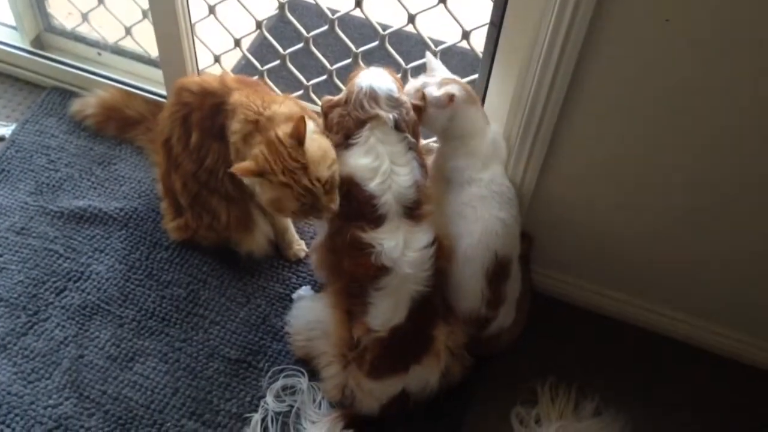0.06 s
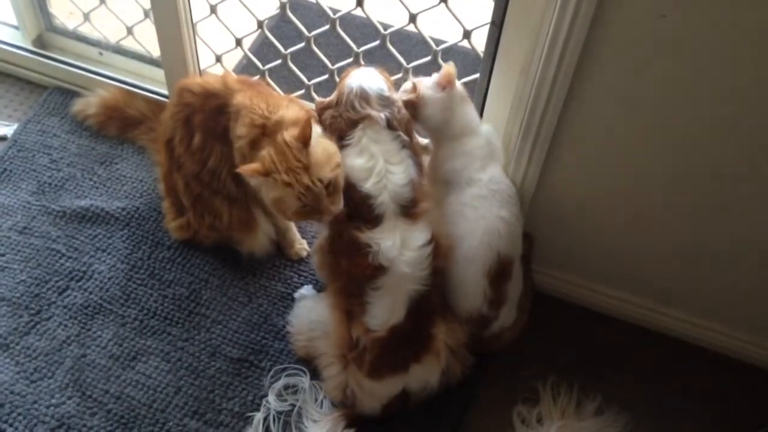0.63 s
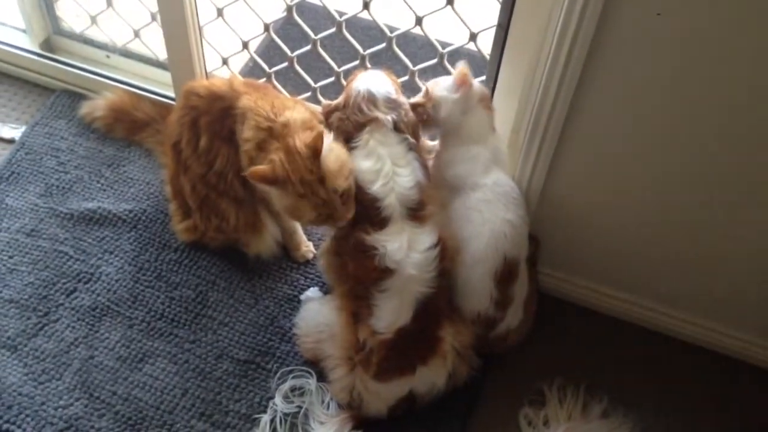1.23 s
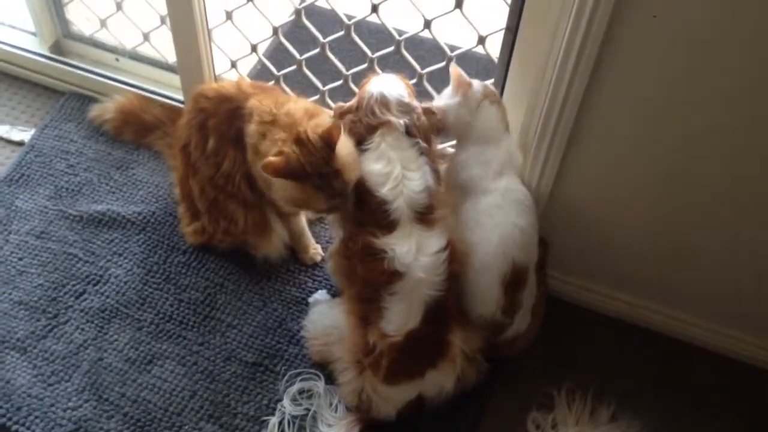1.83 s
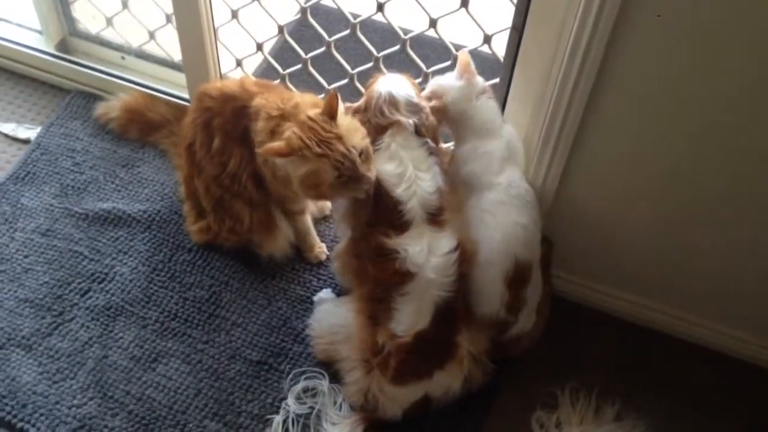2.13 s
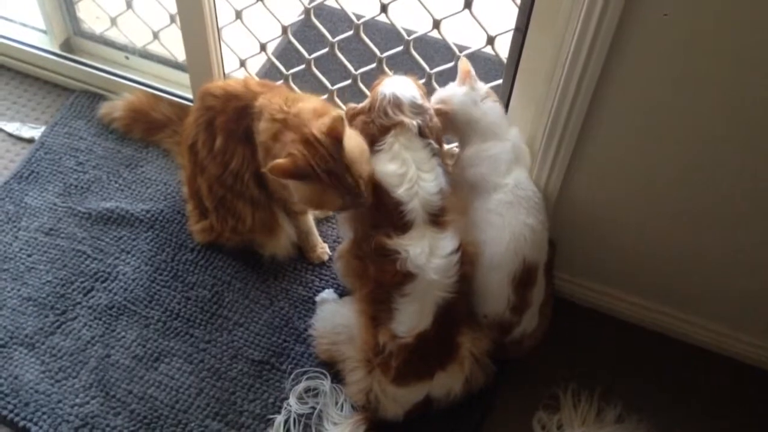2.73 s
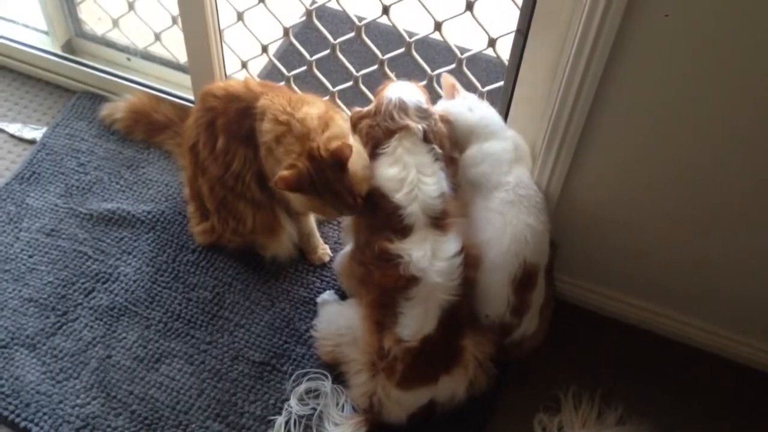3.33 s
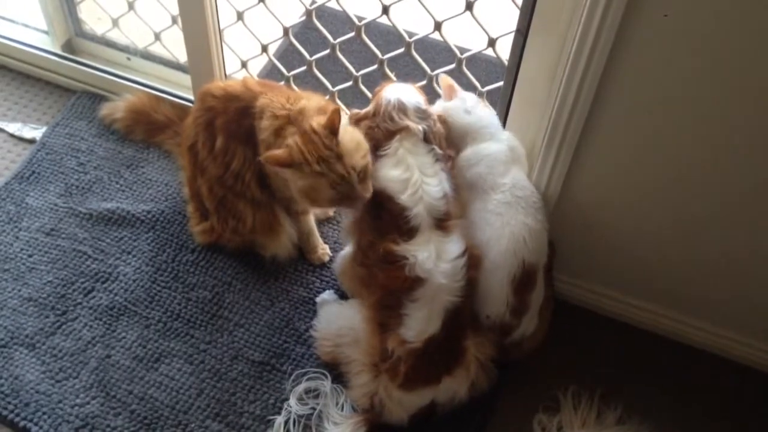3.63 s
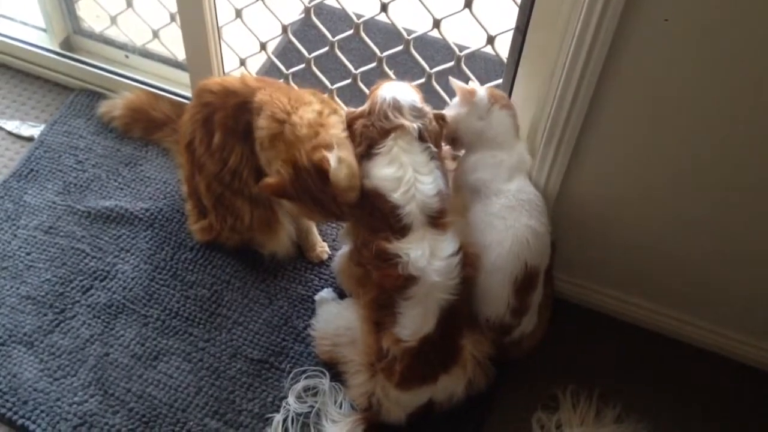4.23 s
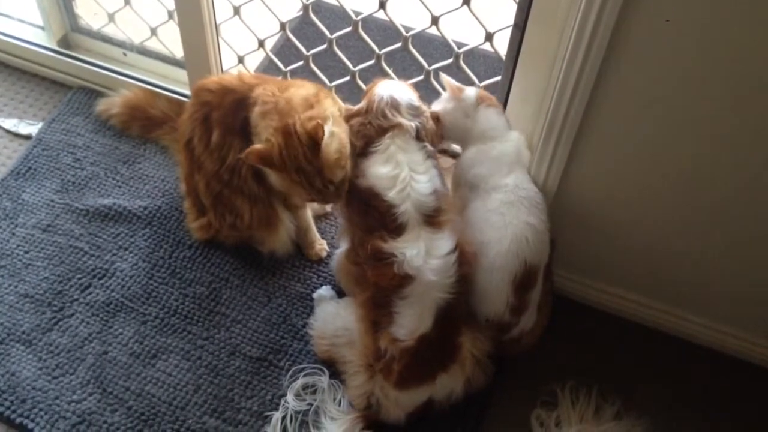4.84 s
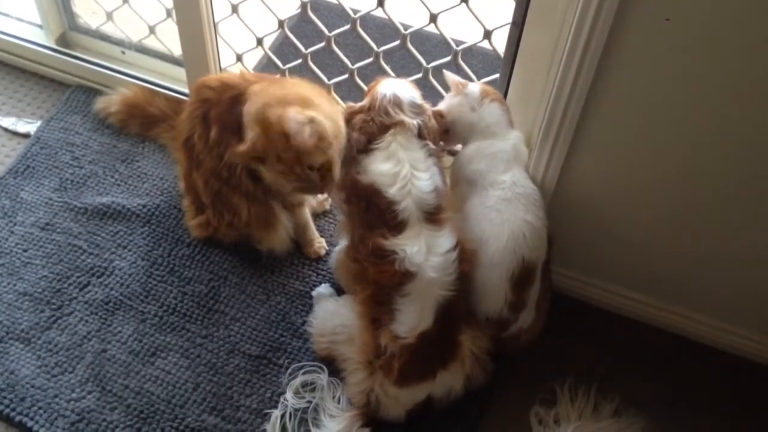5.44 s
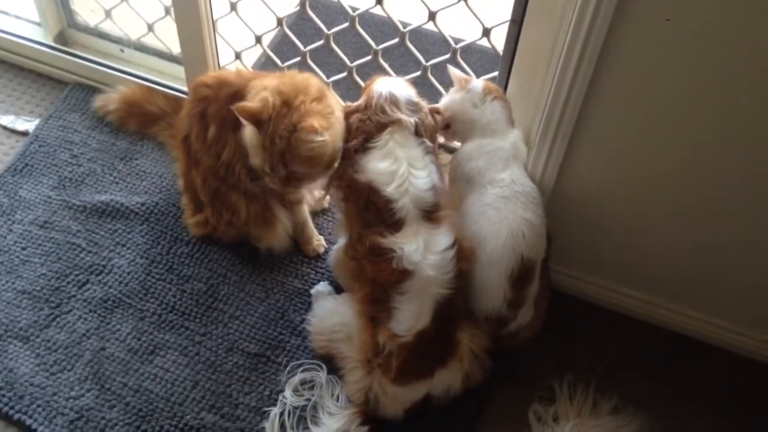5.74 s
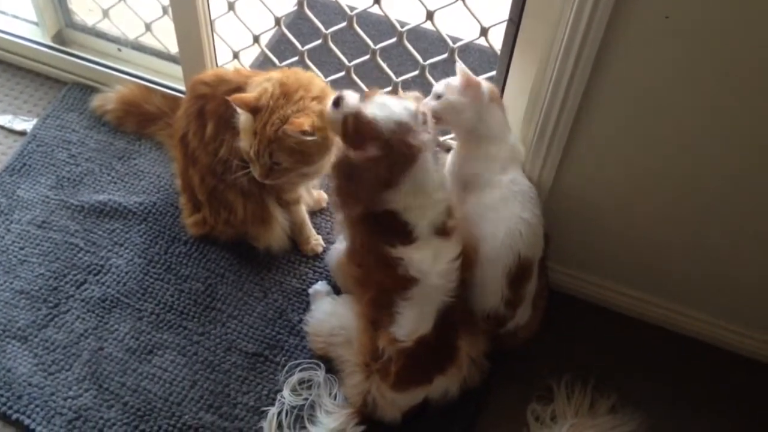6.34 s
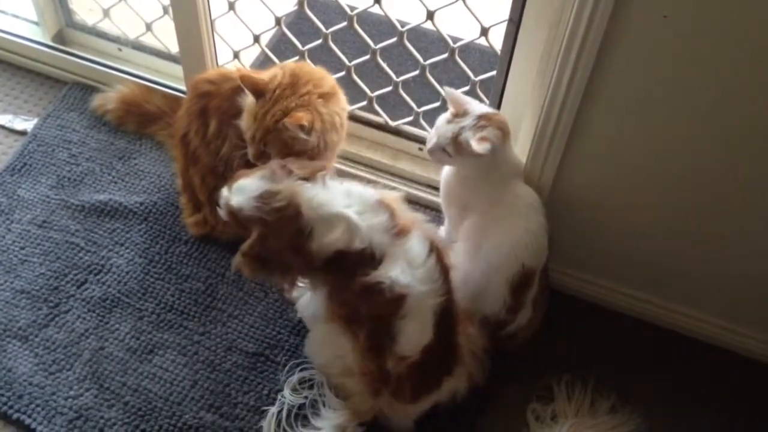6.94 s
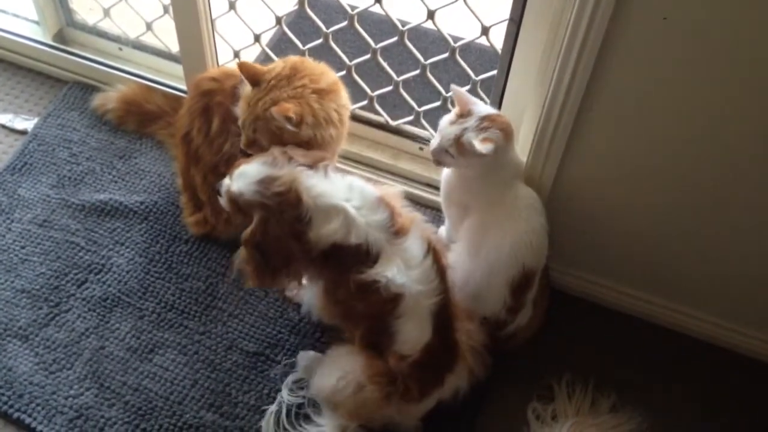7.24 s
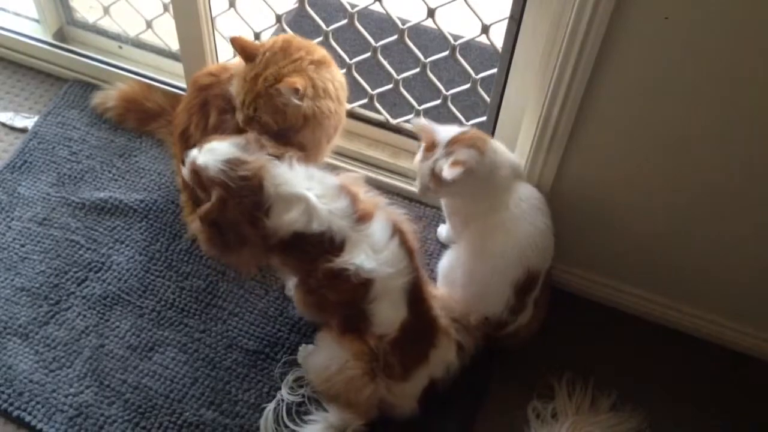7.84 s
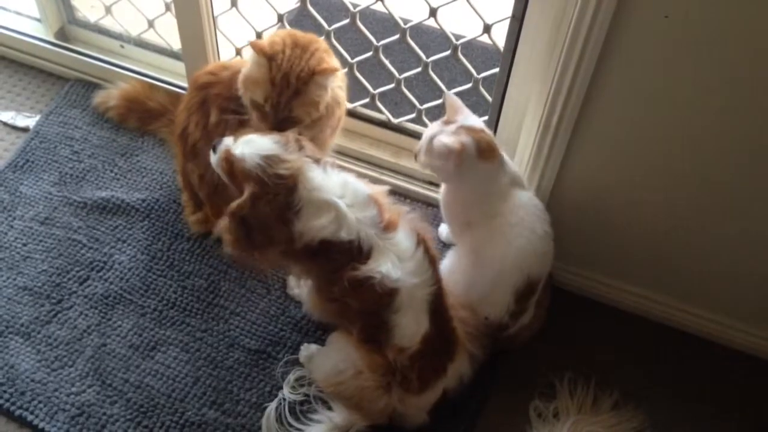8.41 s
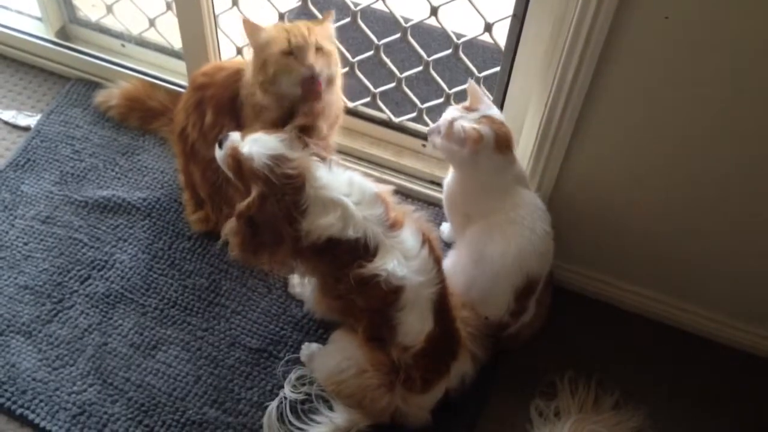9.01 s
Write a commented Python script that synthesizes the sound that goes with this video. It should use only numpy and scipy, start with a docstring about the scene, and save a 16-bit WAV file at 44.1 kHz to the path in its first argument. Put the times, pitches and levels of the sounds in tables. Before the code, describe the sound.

A bird just outside a screen door calls six times, about every two seconds. Each brief call starts as a rasping squeal and cracks upward into a shrill whistle, ringing slightly in the porch and hallway. Distant birds add faint chirps, then soft nasal calls. A pet bumps the floor once midway, and fur barely brushes the door. A small microphone picks up a low hum and quiet outdoor hush.

```python
"""A bird just outside a screen door calls six times, each a low, rasping squeal that cracks upward into a
shrill whistle as its vibrating membrane flips register. Three drawn calls climb the same six notes; three
sharp ones swoop and leap briefly to a top note. The porch and the hallway ring after them.
Farther off, birds chirp and call faintly; a pet bumps the floor once and fur brushes the door.
Under it all, the small microphone picks up a low hum and a quiet outdoor hush."""
import sys
import numpy as np
from scipy import signal
from scipy.fft import rfft, irfft, next_fast_len
from scipy.io import wavfile
from scipy.ndimage import uniform_filter1d, map_coordinates

SR = 44100
rng = np.random.default_rng(int(sys.argv[2]) if len(sys.argv) > 2 else 0)


def dump_mix(stems):
    """Bounce the given channels to the path in sys.argv[1] as a 16-bit WAV at rate SR."""
    frames = np.atleast_2d(stems).T  # one column per channel
    limited = np.clip(frames, -1, 1)  # hard clip at full scale
    pcm = np.round(limited * 32767).astype(np.int16)
    wavfile.write(sys.argv[1], SR, pcm)


N = 404397

# colour of the outdoor hush: frequency_hz, relative_db
HUSH_COLOUR = [(12, -50), (20, -12), (57, -6.5), (76, -1), (118, -12), (170, -10.5), (206, -13.5),
               (340, -13.5), (488, -19.5), (782, -18), (2660, -27), (3810, -26.5), (6460, -30.5),
               (14100, -32), (15300, -32.5)]
# course that the hum wavers around: time_s, level_db
HUM_LEVELS = [(0, -65), (.8, -66), (1.4, -65.5), (1.8, -72), (3.1, -64.5), (4, -68), (5.2, -72.5),
              (8.6, -76.5), (9.15, -70)]
# soft contacts of the pet's one bump: start_s, strike_db
PET_CONTACTS = [(4.384, -52.5), (4.413, -55), (4.440, -58)]
# modes of the floor: frequency_hz, gain_db, t60_s
FLOOR_MODES = [(71, -3, 0.117), (139, 8, 0.051), (186, -17, 0.028)]
# fur against the door: centre_s, half_length_s, level_db
FUR_BRUSHES = [(0.788, .025, -64.5), (1.277, .01, -64), (6.603, 0.069, -69.5)]

# distant chirps: start_s, length_s, start_hz, end_hz, source_db, rasp (0-1)
FAR_CHIRPS = [(2.17, .11, 3880, 2880, -64, .03), (3.41, .15, 3880, 3930, -69, .25),
              (4.645, .03, 3720, 3760, -64, .1)]
# distant nasal calls: start_s, source_db
FAR_NASAL_CALLS = [(6.16, -64.5), (6.67, -68), (7.27, -64.5), (7.78, -65), (8.27, -66.5)]
# strength of a harmonic by where it falls, for each voice: frequency_hz, relative_db
FAR_CHIRP_COLOUR = [(4000, -1), (7500, -14)]
FAR_NASAL_COLOUR = [(650, -8), (1300, 1), (1950, 0), (2600, -18)]
SWOOP_SQUEAL_COLOUR = [(1150, -19.5), (1550, -9), (2400, -7.5), (3100, 2), (3600, -1), (4300, 10),
                       (4800, 1.5), (5600, -4), (7200, -16.5), (9500, -22), (12000, -39)]
DRAWN_SQUEAL_COLOUR = [(1400, -11.5), (2900, 3.5), (4300, -10.5), (5800, -20), (7300, -25), (10000, -38)]
NEAR_WHISTLE_COLOUR = [(2700, 6), (3100, -1.5), (3500, 0.5), (4800, 1.5), (5500, 5.5), (6300, -8),
                       (7000, -12), (8000, -11.5), (8600, -14.5), (9500, -17), (10200, -31), (11000, -21),
                       (12000, -32.5), (15000, -32)]
# colour of the air in a rasp: frequency_hz, relative_db
BREATH_COLOUR = [(1000, -23), (2400, -15), (3700, 10.5), (4900, -31), (7000, -5), (10000, -10),
                 (15000, -20)]

# squeals opening the sharp calls, and two brief ones inside drawn calls, one curve each:
# time_s, pitch_hz, level_db, rasp (0-1)
SWOOP_SQUEALS = [
    [(.258, 1250, -50, 0.01), (.271, 1352, -50, 0.3), (.274, 1012, -44, 0.13), (.284, 1221, -35.5, .2),
     (.293, 1084, -34, 0.45), (.296, 1499, -41, .3), (.303, 1561, -33.5, 0.27), (.312, 1410, -42, .45),
     (.322, 1184, -31, 0.3), (.342, 1180, -39.5, 0.42), (.353, 1126, -34, 0.6)],
    [(2.527, 1384, -40, 0.35), (2.548, 1335, -51, 0.29)],
    [(4.212, 1412, -34.5, 0.15), (4.233, 1367, -44.5, 0.14)],
    [(5.678, 1290, -44, 0.25), (5.697, 1533, -39.5, 0.26), (5.714, 1765, -45.5, 0.24),
     (5.722, 1710, -37, 0.64), (5.727, 1610, -40.5, 0.1), (5.736, 1604, -35, 0.13)],
    [(8.894, 1066, -44.5, .18), (8.912, 1340, -41.5, 0.32), (8.918, 1620, -42, 0.22),
     (8.931, 1710, -36.5, 0.08), (8.943, 1600, -39.5, 0), (8.955, 1435, -30.5, 0.17),
     (8.966, 1443, -39, 0.33)],
]
# whistles of the sharp calls, one curve each: time_s, pitch_hz, level_db, rasp (0-1), overtones_db
SHARP_WHISTLES = [
    [(.352, 3600, -29, 0.4, 5), (.361, 3115, -36, 0, 2.5), (.372, 3400, -32.5, 0.27, -5),
     (.4, 3570, -31, .1, -6), (.413, 4110, -30, 0.1, -7), (.441, 3640, -31.5, 0.2, 0),
     (.462, 4120, -36, .1, -5), (.472, 3890, -31.5, 0.15, 5), (.492, 3845, -32.5, 0.01, -1),
     (.498, 3450, -39.5, 0.11, 2), (.507, 3530, -39, 0.1, 1)],
    [(5.735, 3050, -34, .39, -5), (5.743, 2953, -35.5, 0.1, -3), (5.747, 3410, -33, .11, -6),
     (5.765, 3890, -25, 0.24, -2.5), (5.772, 3410, -32, 0.06, 3), (5.782, 3570, -32, 0.19, 3),
     (5.788, 3280, -32.5, 0.2, 6), (5.797, 3885, -28, 0.02, -6), (5.842, 4050, -29.5, 0.09, 8.5),
     (5.87, 3678, -23.5, .04, -8), (5.905, 3984, -26, .034, -2), (5.921, 3996, -34, 0, 4)],
    [(8.966, 3850, -29, 0.22, -18), (8.981, 4240, -24, 0.1, -21), (8.984, 3140, -34.5, .06, 2.5),
     (8.997, 3663, -29.5, 0.23, 2), (9.014, 3660, -25.5, 0.08, 1.5), (9.02, 4000, -28, .04, -6),
     (9.069, 3780, -30.5, .04, -2), (9.08, 4076, -28, 0.12, -4.5), (9.098, 4080, -33.5, .04, -8)],
]
# the top note of each sharp whistle: start_s, length_s, pitch_hz, level_db
TOP_NOTES = [(.413, .028, 4730, -29), (5.808, 0.019, 4915, -29), (9.019, .043, 4725, -31)]
# squeals opening the drawn calls:
# start_s, crack_s, settled_hz, crack_db, overtones_db, start_pitch_factor, crack_rasp (0-1), fade_s
DRAWN_OPENINGS = [(2.454, 2.51, 1486, -41.5, 4.5, 1.08, 0.56, .03),
                  (4.093, 4.157, 1459, -45, -3.5, 1, 0.79, 0.0445),
                  (7.221, 7.285, 1386, -49, -2, 1.08, 0.45, .008)]
# six notes of a drawn whistle before voicing (held note, step, dip, flick, crest, final rise):
# start_hz, middle_hz, end_hz, start_db, middle_db, end_db, start_rasp, end_rasp (0-1), overtones_db
DRAWN_NOTES = [(2680, 2800, 2760, -42, -43, -56, .25, 0.04, 0),
               (3270, 3340, 3450, -36, -35, -34.5, 0.15, 0.21, -6),
               (3153, 3120, 3350, -37.5, -36, -37.5, 0.17, .08, 5),
               (3457, 3770, 3500, -38, -32.5, -34, 0.2, 0.14, 1.5),
               (3564, 3480, 3420, -30.5, -30, -31.5, 0.13, 0.04, -2.5),
               (3426, 3770, 3810, -26.5, -29.5, -34, .05, 0.03, -4)]
# note onsets and end of each drawn whistle: held_s, step_s, dip_s, flick_s, crest_s, rise_s, end_s
DRAWN_NOTE_EDGES = [(2.511, 2.582, 2.603, 2.639, 2.648, 2.684, 2.701),
                    (4.157, 4.230, 4.254, 4.282, 4.290, 4.329, 4.356),
                    (7.283, 7.350, 7.374, 7.407, 7.417, 7.450, 7.488)]
# voicing of each drawn whistle: held_pitch_factor, dip_pitch_factor, crest_pitch_factor, early_gain_db,
# late_gain_db, early_overtones_db, dip_overtones_db, late_overtones_db, rasp_factor
DRAWN_VOICINGS = [(1.0, 1.014, 1.03, 1, -1, 2.5, 0.5, -7, 0.88),
                  (1.012, .955, 0.99, 0, -1.5, 1, -4, -4, 1.53),
                  (.962, 1.025, 1.012, 3.5, 3, -1.5, 1, -0.5, 0.91)]

# how strongly the walls answer: frequency_hz, gain_db
WALL_COLOUR = [(600, -4), (1450, 5), (2750, 0.5), (3600, 0), (4300, -2), (4850, 1.5), (5500, 4),
               (7300, 0.5), (10000, -2)]
# how long the porch and the hallway ring: frequency_hz, t60_s
PORCH_DECAY = [(500, 0.39), (4000, 0.24), (12000, 0.11)]
HALLWAY_DECAY = [(500, 1), (3800, 0.69), (8000, 0.65), (14000, 0.63)]


def amp(db):
    """Decibels to gain."""
    return 10 ** (np.asarray(db) / 20)


def unit(x):
    """Scale to rms 1."""
    return x / np.sqrt(np.mean(x ** 2) + 1e-20)


def along(points, hz):
    """Interpolate (frequency_hz, value) points on a log frequency axis."""
    knots_hz, values = np.transpose(points)
    return np.interp(np.log(hz + 1), np.log(knots_hz + 1), values)


def wobble(rate):
    """A smooth random curve, rate knots a second."""
    return map_coordinates(rng.standard_normal(int(N * rate / SR) + 4), [np.arange(N) * rate / SR])


def filtered(x, response):
    """Filter x by a gain that depends on frequency."""
    size = next_fast_len(N + SR // 2)
    return irfft(rfft(x, size) * response(np.fft.rfftfreq(size, 1 / SR)), size)[:N]


def noise(colour):
    """Noise of rms 1 with the given colour."""
    return unit(filtered(rng.standard_normal(N), lambda hz: amp(along(colour, hz))))


def low_hum(pitch_hz=70, waver_db=3):
    """A low hum under everything, wavering in pitch and level."""
    phase = 2 * np.pi * np.cumsum(pitch_hz * (1 + 0.0607 * wobble(16))) / SR
    level_db = np.interp(np.arange(N) / SR, *np.transpose(HUM_LEVELS))
    return amp(level_db + waver_db * wobble(14)) * unit(np.sin(phase))


def outdoor_hush(level_db=-61.3, swell_db=0.67, dip_hz=2800, dip_width_hz=230, dip_db=-3):
    """The quiet air outside, swelling gently in its middle range."""
    hush = filtered(noise(HUSH_COLOUR), lambda hz: amp(dip_db * np.exp(-((hz - dip_hz) / dip_width_hz) ** 2)))
    middle = filtered(hush, lambda hz: amp(along([(80, -30), (200, -12.5), (1800, 4), (5000, -48)], hz)))
    swell = amp(swell_db * wobble(7.6)) - 1
    return amp(level_db) * (hush + middle * swell)


def floor_bump():
    """A pet bumps the floor: three quick, soft contacts ring its low modes."""
    age = np.arange(SR // 2) / SR
    thud = sum(amp(db - 60 * age / t60) * np.sin(2 * np.pi * hz * age) for hz, db, t60 in FLOOR_MODES)
    blows = np.zeros(N)
    for start, strike_db in PET_CONTACTS:
        blows[round(start * SR)] = amp(strike_db)
    return signal.fftconvolve(blows, thud)[:N]


def fur_on_door():
    """Fur brushes the door in brief, soft swells of noise."""
    t = np.arange(N) / SR
    strokes = sum(amp(db) * np.exp(-((t - centre) / width) ** 2) for centre, width, db in FUR_BRUSHES)
    return strokes * noise([(300, 3), (1500, 1), (5000, -5), (14000, -15)])


def echoes(x, decay, delay_s):
    """Diffuse reflections around the microphone: each frequency dies at its own speed."""
    hz, t, spectrum = signal.stft(rng.standard_normal(SR), SR, nperseg=256)
    fade = amp(-60 * t / along(decay, hz)[:, None])
    tail = signal.istft(spectrum * fade, SR, nperseg=256)[1]
    response = np.pad(tail / np.linalg.norm(tail), (int(delay_s * SR), 0))
    return signal.fftconvolve(x, response)[:N]


def controls(phrases):
    """Whether a bird is blowing, then each column of its curves, sample by sample."""
    t = np.arange(N) / SR
    blowing = np.any([(t >= rows[0][0]) & (t < rows[-1][0]) for rows in phrases], axis=0).astype(float)
    points = np.vstack(phrases)
    times, *columns = points[np.argsort(points[:, 0])].T
    return [blowing] + [np.interp(t, times, column) for column in columns]


def syrinx(blowing, pitch, db, rasp, overtones_db=0, *,
           colour, harmonics, edge_s, build_s, tremor, jitter, buzz_hz, buzz, air_db):
    """A membrane's harmonics glide through a fixed colour; rasp makes them unsteady, buzzy and airy."""
    soften = lambda curve: uniform_filter1d(curve, max(int(edge_s * SR), 1))
    pitch, rasp = soften(pitch), soften(np.clip(rasp, 0, 1))
    unsteady = (tremor + jitter * rasp) * wobble(330)
    phase = 2 * np.pi * np.cumsum(pitch * (1 + unsteady)) / SR
    # in rasping notes a slower second vibration shakes the membrane and adds sidebands
    shake = buzz * rasp * np.sin(2 * np.pi * np.cumsum(buzz_hz * (1 + .25 * wobble(200))) / SR)
    # out of silence the vibration needs a moment to build up
    keep = np.exp(-1 / (build_s * SR))
    build_up = signal.lfilter([1 - keep], [1, -keep], blowing)
    loudness = soften(blowing * build_up * amp(db))
    gains = [amp(along(colour, k * pitch) + (k > 1) * overtones_db) * (k * pitch < SR / 2)
             for k in range(1, harmonics + 1)]
    tone = sum(gain * np.sin(k * phase) for k, gain in enumerate(gains, 1)) / np.linalg.norm(gains, axis=0)
    breath = amp(air_db) * rasp * noise(BREATH_COLOUR)
    return loudness * (tone * (1 + shake) + breath)


def far_birds(nasal_s=.115, nasal_hz=672, droop_hz=24, nasal_rasp=0.0368):
    """Farther off: three thin chirps, then five nasal calls, each a small arch of pitch."""
    chirps = [[(start, start_hz, db, rasp), (start + length, end_hz, db, rasp)]
              for start, length, start_hz, end_hz, db, rasp in FAR_CHIRPS]
    arch = np.linspace(-1, 1, 5)
    nasal = [[(start + nasal_s * (u + 1) / 2, nasal_hz - droop_hz * u * u, db, nasal_rasp) for u in arch]
             for start, db in FAR_NASAL_CALLS]
    voice = dict(edge_s=0.015, build_s=0.002, tremor=0.00468, jitter=0.124, buzz_hz=90, buzz=1, air_db=-12)
    return (syrinx(*controls(chirps), colour=FAR_CHIRP_COLOUR, harmonics=2, **voice)
            + syrinx(*controls(nasal), colour=FAR_NASAL_COLOUR, harmonics=4, **voice))


def drawn_squeal(start, crack, hz, db, overtones_db, start_factor, crack_rasp, fade_s):
    """Curve of a clean squeal that turns harsh as the whistle takes over."""
    sag, clean_rasp = 0.98, 0.035
    points = [(start, hz * start_factor, db - 7.5, clean_rasp),  # starts softly
              (start + 0.02335, hz, db - 2.5, clean_rasp),  # settles
              (crack - 0.004, hz * sag, db + 4, clean_rasp),  # swells
              (crack, hz * sag ** 2, db, crack_rasp),  # cracks
              (crack + fade_s, hz * sag ** 2, db - 22.5, crack_rasp)]  # fades
    return [(*point, overtones_db) for point in points]


def drawn_whistle(edges, held, dip, crest, early_db, late_db,
                  early_bright_db, dip_bright_db, late_bright_db, harshness):
    """Curve of the six notes, each an arc of pitch and level, timed, bent and weighted for one call."""
    u = np.linspace(0, 1, 7)
    arc = lambda values: np.polyval(np.polyfit([0, .5, 1], values, 2), u)
    bends = [held, 1, dip, 1, crest, 1]
    gains_db = np.linspace(early_db, late_db, len(DRAWN_NOTES))
    brights_db = [early_bright_db, 0, dip_bright_db, 0, late_bright_db, late_bright_db]
    points = []
    for i, note in enumerate(DRAWN_NOTES):
        pitches_hz, levels_db, rasps, overtones_db = note[:3], note[3:6], note[6:8], note[8]
        times = edges[i] + u * (edges[i + 1] - edges[i] - 1 / SR)
        pitch = bends[i] * arc(pitches_hz)
        level = gains_db[i] + arc(levels_db)
        rasp = harshness * np.interp(u, [0, .5], rasps)
        points += zip(times, pitch, level, rasp, np.full_like(u, overtones_db + brights_db[i]))
    return points


def low_register():
    """The membrane's low, rasping squeals, swooping or drawn."""
    swoops = syrinx(*controls(SWOOP_SQUEALS), colour=SWOOP_SQUEAL_COLOUR, harmonics=10, edge_s=0.0024,
                    build_s=0.0038, tremor=.0022, jitter=0.0598, buzz_hz=515, buzz=1, air_db=-5)
    curves = [drawn_squeal(*row) for row in DRAWN_OPENINGS]
    drawn = syrinx(*controls(curves), colour=DRAWN_SQUEAL_COLOUR, harmonics=6, edge_s=0.0031,
                   build_s=0.0027, tremor=0.0023, jitter=.14, buzz_hz=591, buzz=1.4, air_db=-5)
    return swoops + drawn


def high_register(leap_rasp=0.034, leap_overtones_db=-8.5):
    """The whistles that close the calls; in a leap the voice jumps to a purer top note and back."""
    drawn = [drawn_whistle(edges, *voicing) for edges, voicing in zip(DRAWN_NOTE_EDGES, DRAWN_VOICINGS)]
    blowing, *voice = controls(SHARP_WHISTLES + drawn)
    t = np.arange(N) / SR
    for start, length, top_hz, top_db in TOP_NOTES:
        leaping = (t >= start) & (t < start + length)
        top_note = [top_hz, top_db, leap_rasp, leap_overtones_db]
        voice = [np.where(leaping, top, usual) for top, usual in zip(top_note, voice)]
    return syrinx(blowing, *voice, colour=NEAR_WHISTLE_COLOUR, harmonics=5, edge_s=0.0017,
                  build_s=0.0034, tremor=0.0026, jitter=0.052, buzz_hz=413, buzz=0.77, air_db=-16.5)


def near_bird():
    """Just outside the door, the voice flips from low register to high; both sound where it cracks."""
    return low_register() + high_register()


def scene():
    """At the screen door the near bird is mostly direct; the far ones arrive half as echo."""
    near, far = near_bird(), far_birds() / 2
    reflected = filtered(near, lambda hz: amp(along(WALL_COLOUR, hz)))
    porch = amp(-11.5) * echoes(reflected, PORCH_DECAY, delay_s=.004)
    hallway = echoes(amp(-19.5) * reflected + far, HALLWAY_DECAY, delay_s=.012)
    pet = floor_bump() + fur_on_door()
    return (near + far + porch + hallway + pet + low_hum() + outdoor_hush())[None]


def record(dry, bass_hz=36, top_hz=15350):
    """The small microphone loses the deepest bass, and the recorder keeps nothing above its band limit."""
    thin = filtered(dry[0], lambda hz: hz ** 3 / np.sqrt(hz ** 6 + bass_hz ** 6))
    return filtered(thin, lambda hz: hz < top_hz)[None]


dry = scene()
out = record(dry)
dump_mix(out)
```